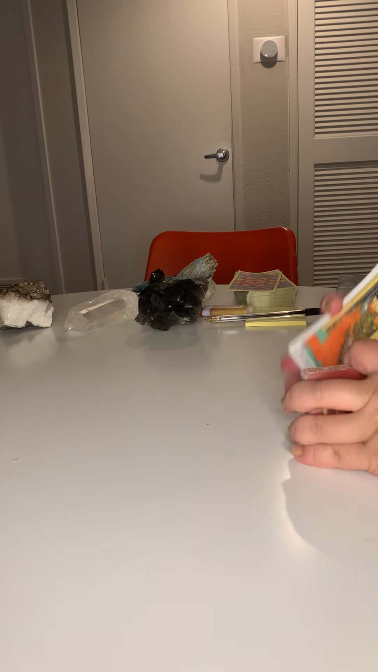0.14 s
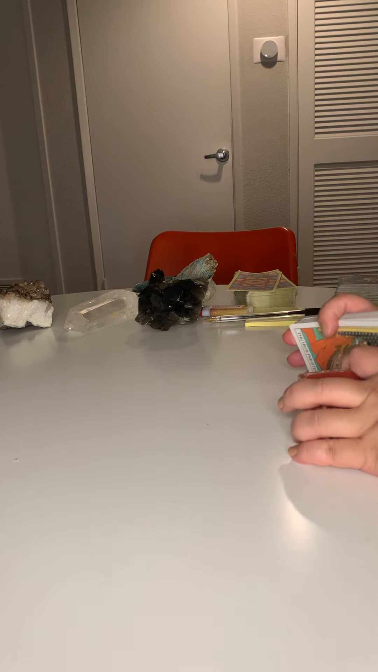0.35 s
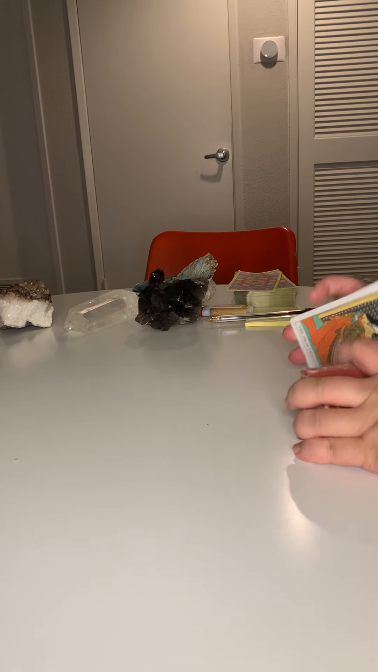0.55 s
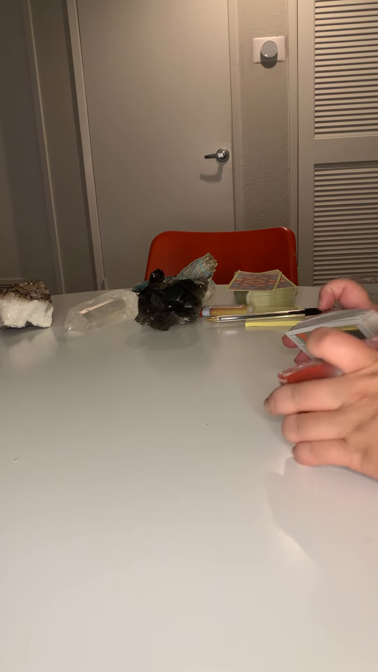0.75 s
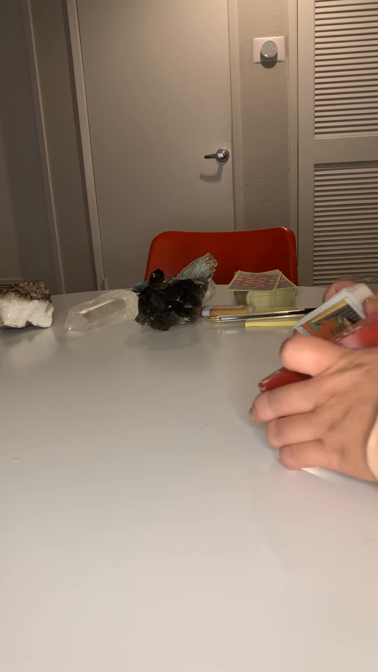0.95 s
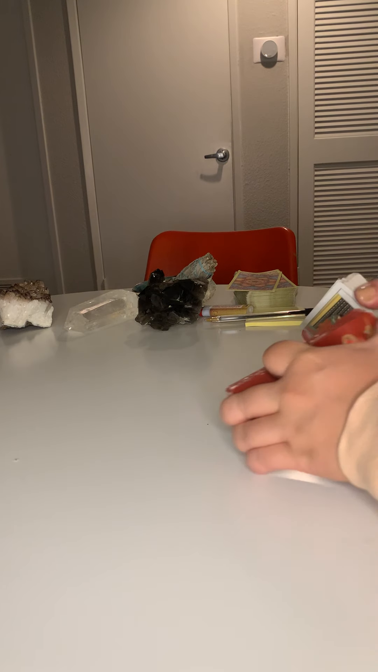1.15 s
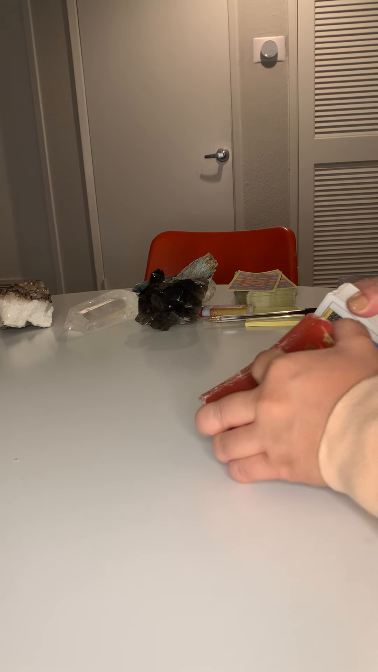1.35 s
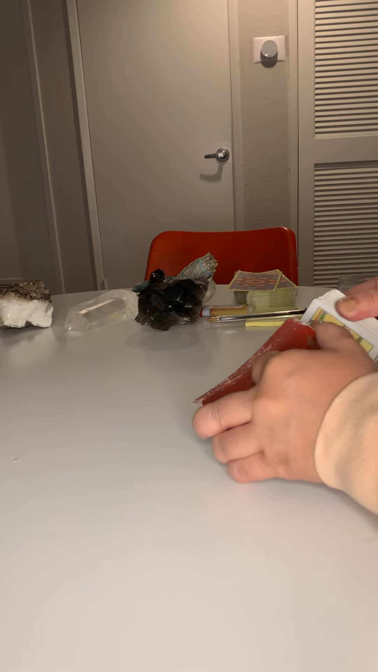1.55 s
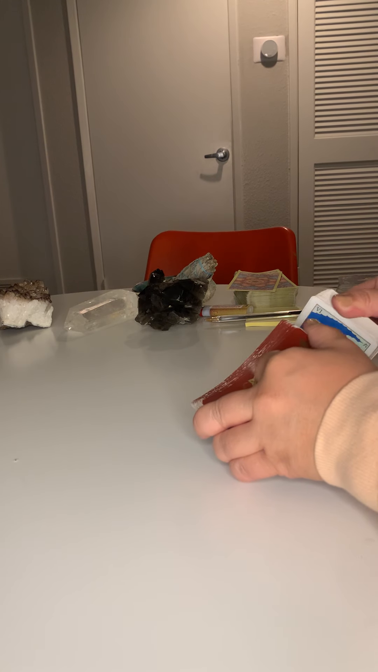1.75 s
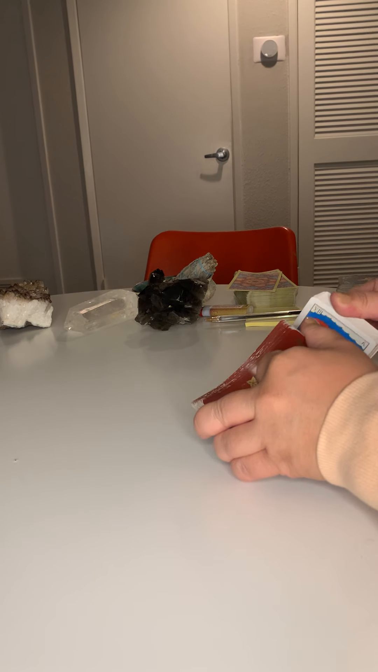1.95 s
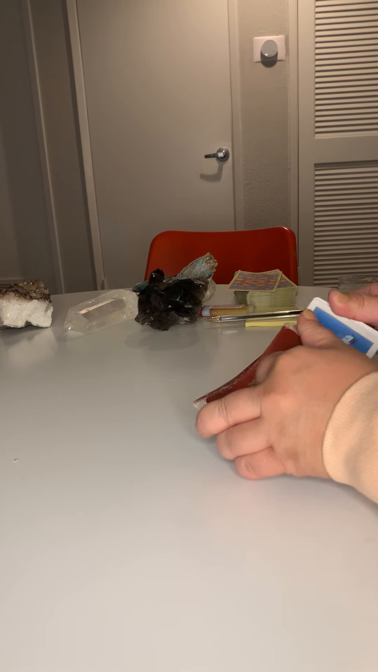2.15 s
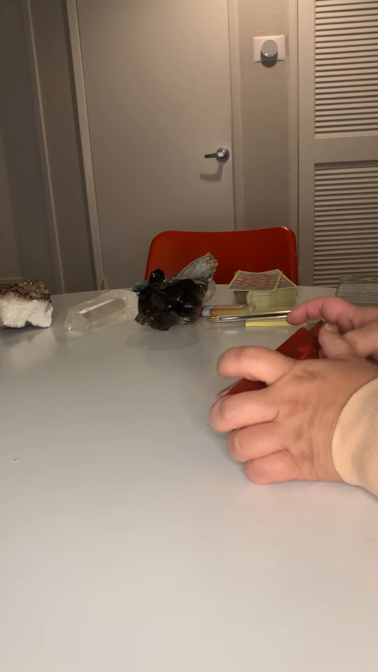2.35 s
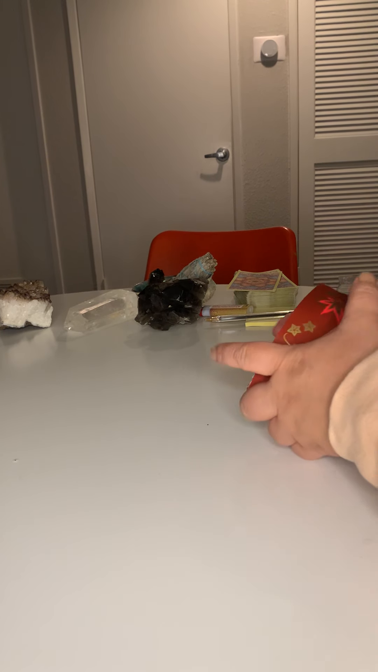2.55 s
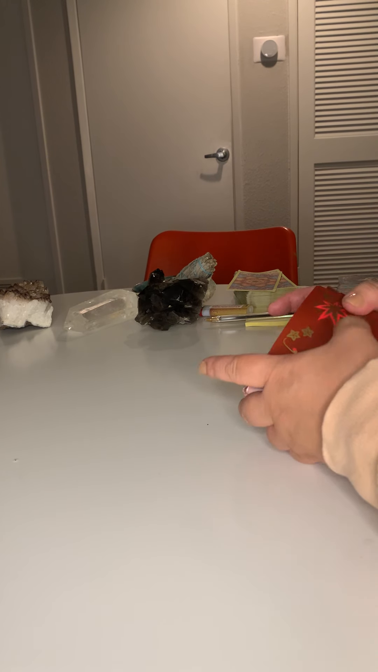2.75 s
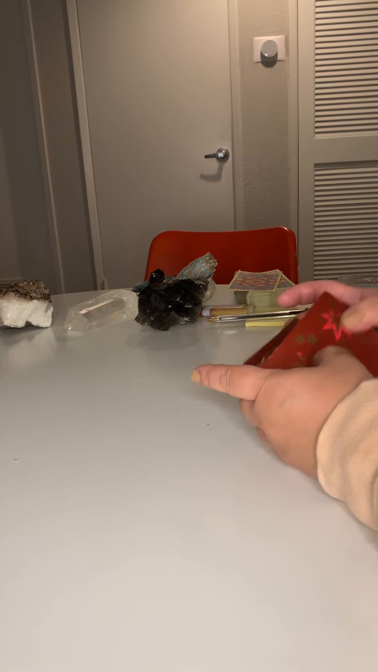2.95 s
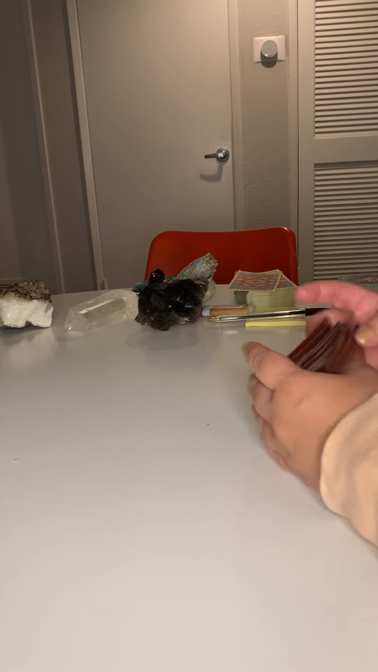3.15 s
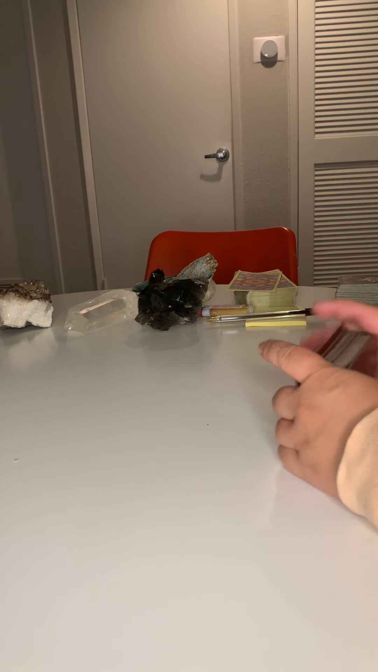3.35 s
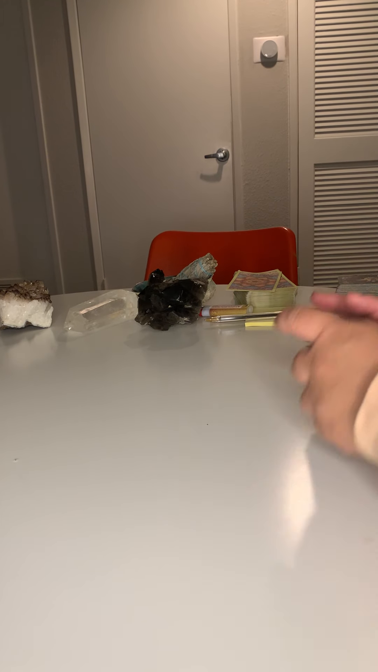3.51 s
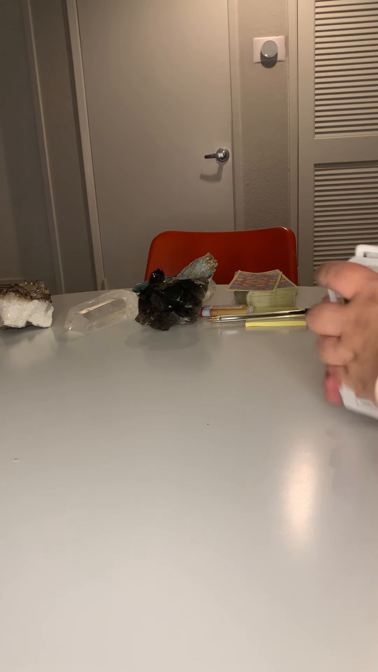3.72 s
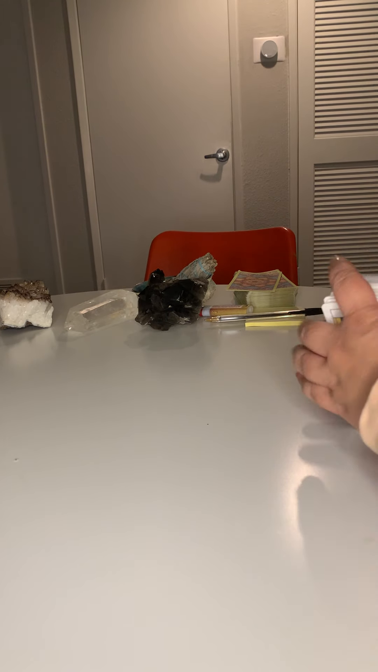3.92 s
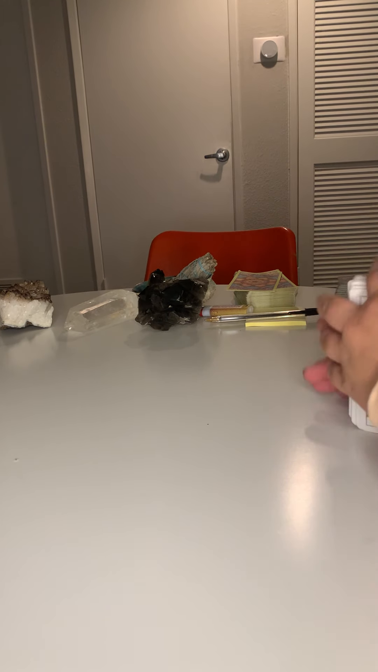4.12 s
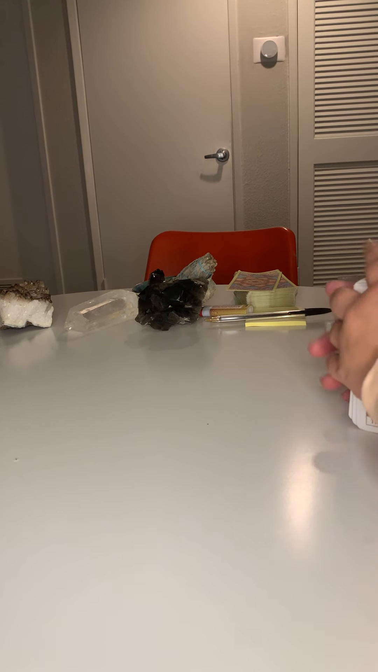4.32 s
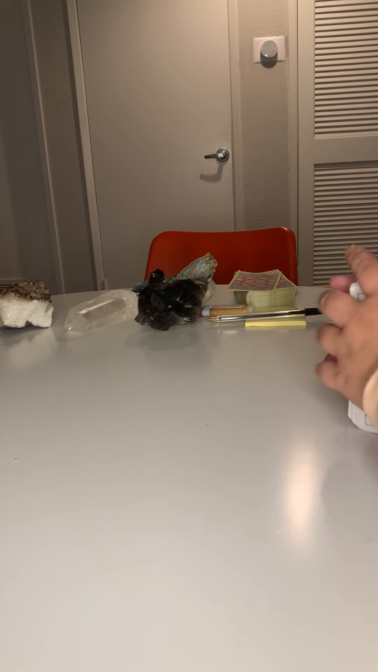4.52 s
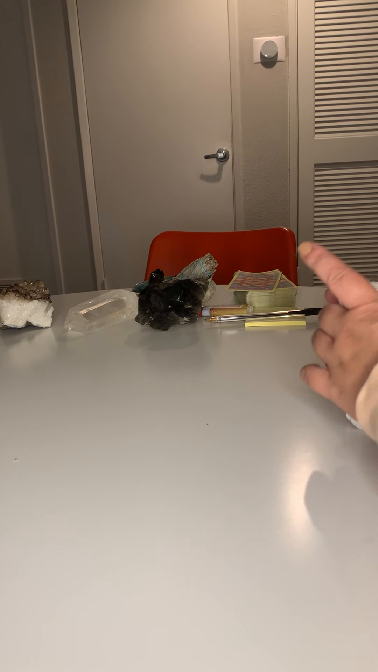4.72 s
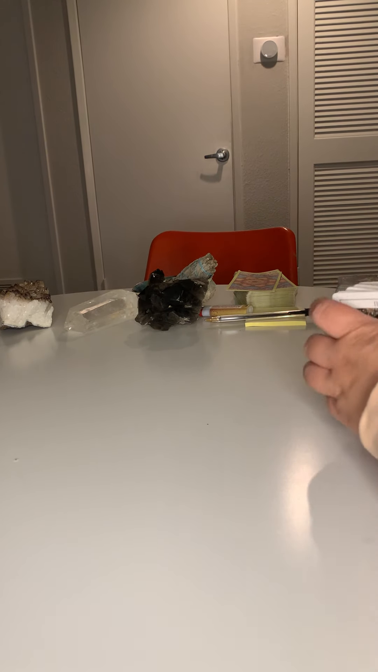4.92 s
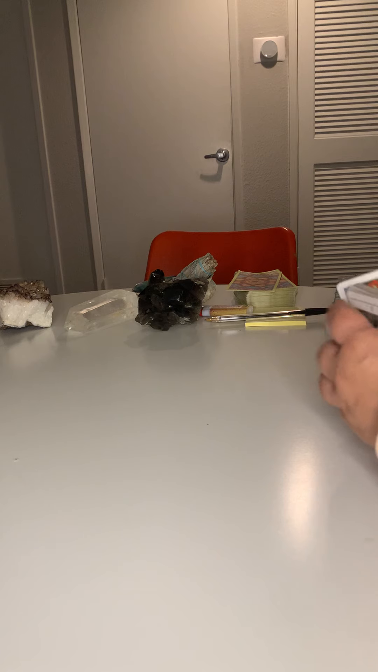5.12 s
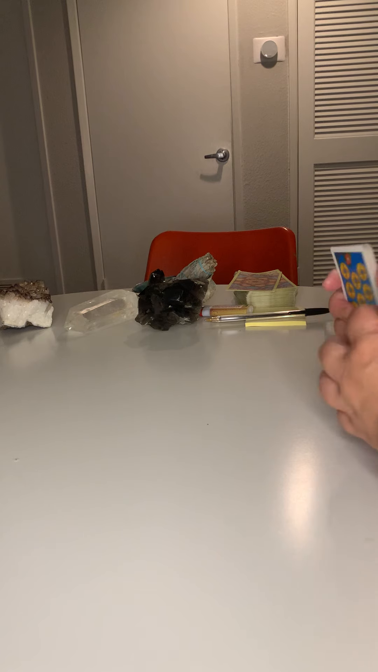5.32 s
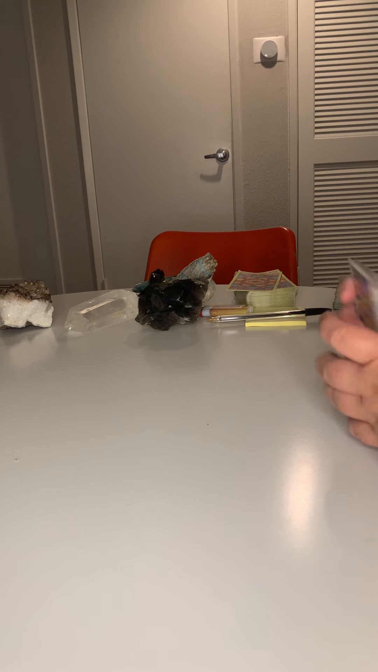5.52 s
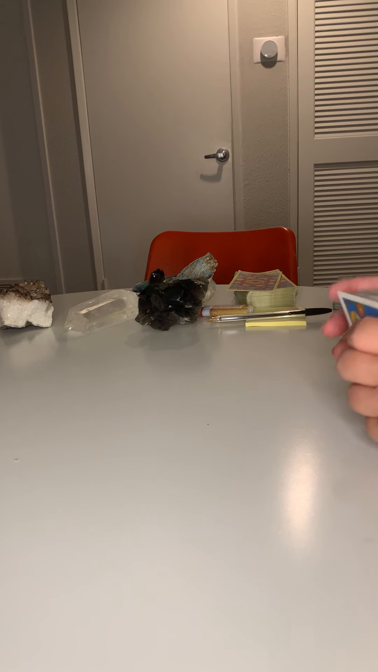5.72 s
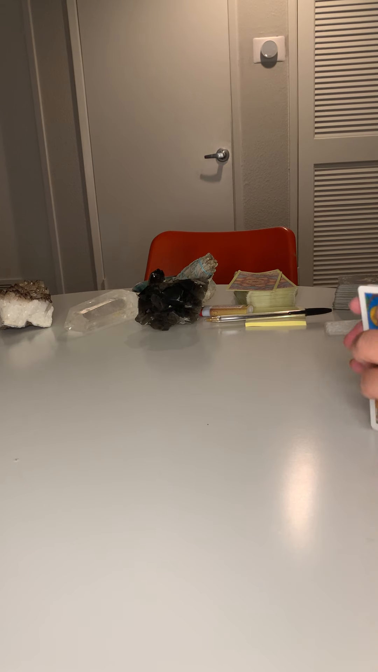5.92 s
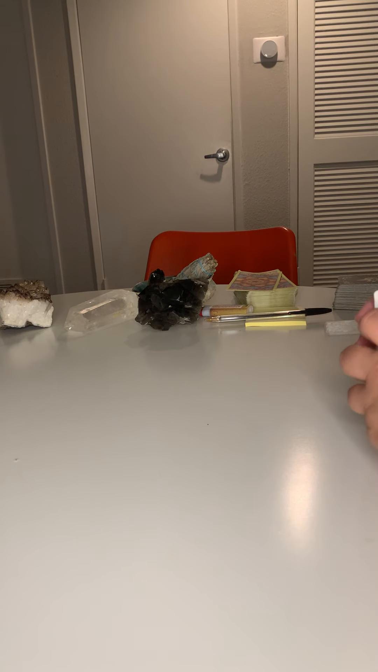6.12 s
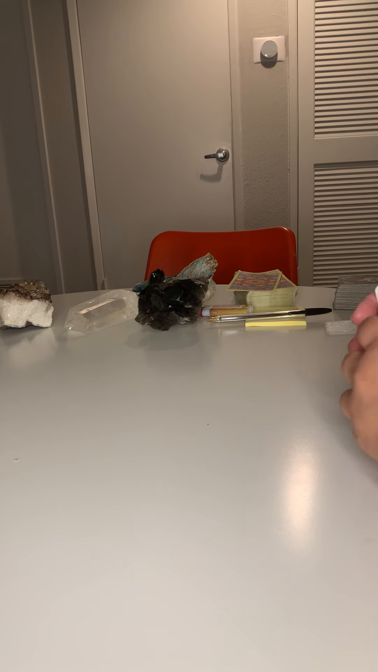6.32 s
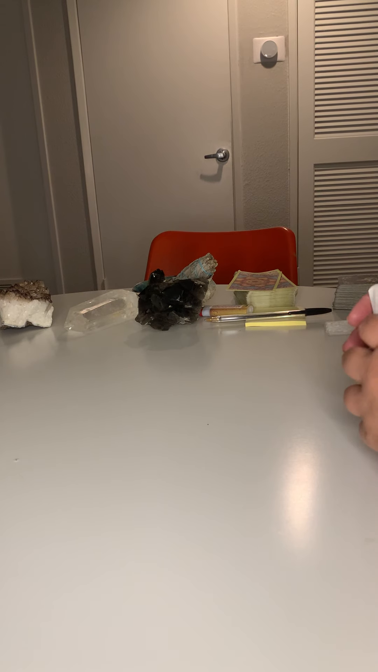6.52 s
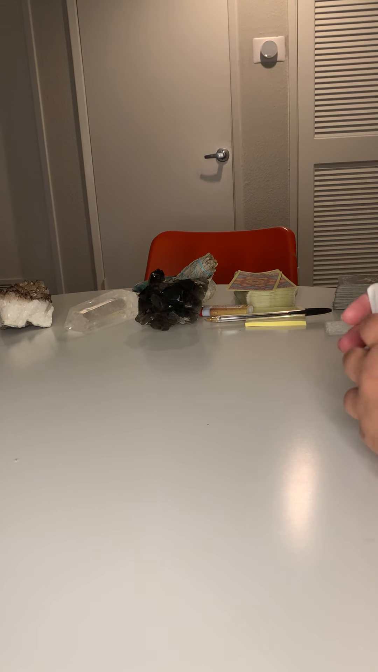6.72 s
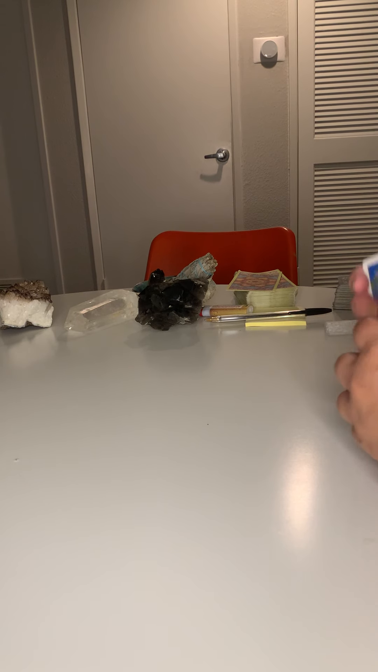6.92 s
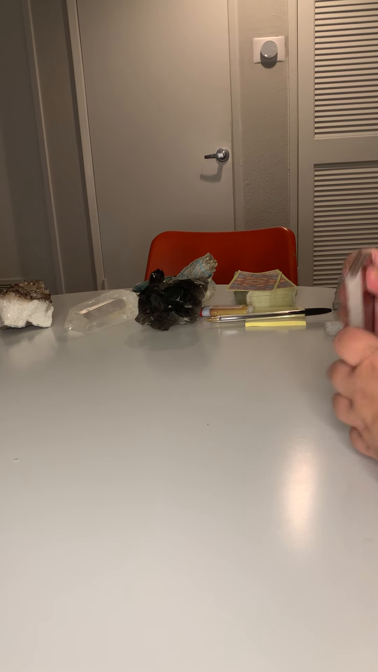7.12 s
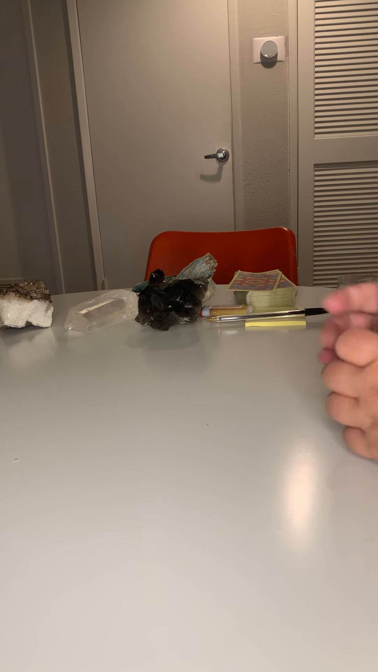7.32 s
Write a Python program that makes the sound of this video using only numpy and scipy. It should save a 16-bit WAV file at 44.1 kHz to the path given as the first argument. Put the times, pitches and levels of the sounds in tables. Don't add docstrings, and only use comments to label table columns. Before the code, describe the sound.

Cards flutter and slide in a rapid riffle, followed by softer knocks, pats and packet drops, close up in a small humming room.

```python
import sys
import numpy as np
from scipy import signal
from scipy.fft import rfft, irfft
from scipy.io import wavfile
from scipy.ndimage import uniform_filter1d

SR = 44100
rng = np.random.default_rng(int(sys.argv[2]) if len(sys.argv) > 2 else 0)


def digitize_waveform(pressure):
    field = np.atleast_2d(pressure).T
    bounded = np.clip(field, -1, 1)
    quanta = np.round(bounded * 32767).astype(np.int16)
    wavfile.write(sys.argv[1], SR, quanta)


def natural_amplitude(level_db):
    exponent = np.asarray(level_db, float) / 20
    return 10 ** exponent


N = 324576

# pitch_hz, level_db, t60_s (time to die by 60 dB)
FLAT_DECK = [(690, -3, 0.011), (1008, 5, 0.012), (1109.5, -4, 0.045), (1270, 0.5, 0.017),
             (1691, -1.5, 0.039), (1918, -5, 0.02), (2270, -5, 0.0073)]
DETUNE_HELD, DETUNE_FLAT = 0.066, 0.0071


def evened(x):
    return x / np.sqrt(np.mean(x ** 2) + 1e-20)


def read(points, hz):
    f, value = np.transpose(points)[:2]
    return np.interp(np.log(hz + 1), np.log(f + 1), value)


def coloured(x, points):
    gain = natural_amplitude(read(points, np.fft.rfftfreq(len(x), 1 / SR)))
    return evened(irfft(rfft(x) * gain, len(x)))


def drift(rate_hz):
    noise = uniform_filter1d(rng.standard_normal(N), 64)
    return evened(signal.lfilter([1], [1, -np.exp(-2 * np.pi * rate_hz / SR)], noise))


def add(mix, start_s, sound):
    part = mix[round(start_s * SR):][:len(sound)]
    part += sound[:len(part)]


def rung(force, modes, chance, detune=DETUNE_HELD):
    t = np.arange(3000) / SR
    ring = 0
    for (hz, db, t60), u, v in zip(modes, chance, chance[::-1]):
        level = natural_amplitude(db + 3.0 * u - 60 * t / t60)
        ring = ring + level * np.sin(2 * np.pi * hz * (1 + detune * v) * t)
    soft_start = (1 - np.exp(-t * modes[0][0] * 1.8)) ** 2
    out = signal.fftconvolve(force, ring * soft_start)[:max(len(t), len(force))]
    return out / abs(out).max()


def hum():
    # start_s, level_db
    strength = [
        (0.0, -33.5),
        (4.82, -33),
        (7.36, -33),
    ]
    # multiple of shaft pitch, level_db, lead_rad
    shaft_tones = [(1, 0, 0), (2, -19, .2), (3, -19.5, -2.3), (4, -27, .6), (5, -35, 0)]
    # pitch_hz, level_db
    whine_tones = [(383, -78), (406, -73), (592, -73), (773, -75.5)]
    # pitch_hz, level_db
    rumble_colour = [(25, -29), (45, 0), (66, -7), (77, 14.5), (88, 13), (150, 7), (250, -12.5), (400, -52)]
    shaft_hz, rumble_db = 58.02, -53.5
    t = np.arange(N) / SR
    turn = 2 * np.pi * (shaft_hz * t + .008 * drift(.5) - .44)
    shaft = sum(natural_amplitude(db + .5 * (k - 2.5) * drift(12.0)) * np.cos(k * turn + lead)
                for k, db, lead in shaft_tones)
    whines = sum(natural_amplitude(db + 1.6 * drift(3)) * np.sin(2 * np.pi * hz * t) for hz, db in whine_tones)
    rumble = natural_amplitude(rumble_db) * coloured(rng.standard_normal(N), rumble_colour)
    shaft_gain = natural_amplitude(np.interp(t, *np.transpose(strength)))
    return shaft_gain * np.sqrt(2) * shaft + np.sqrt(2) * whines + rumble


def room_air():
    # pitch_hz, level_db
    air_colour = [(150, -26), (250, 0), (600, -13.5), (1200, -26.5), (2500, -43), (5000, -44),
                  (9000, -44.5), (15500, -48)]
    return [natural_amplitude(-59) * coloured(rng.standard_normal(N), air_colour) for _ in range(2)]


def friction(points, per_s, spread_db, share, lumpy_db):
    size = natural_amplitude(spread_db * np.minimum(rng.exponential(1, N), 5))
    ticks = (rng.random(N) < per_s / SR) * size
    ticks = np.convolve(ticks, np.exp(-np.arange(60) / 6.2))[:N] * rng.standard_normal(N)
    share = np.clip(share, 0, 1)
    scrape = share * evened(ticks) + (1 - share) * rng.standard_normal(N)
    return coloured(scrape * natural_amplitude(lumpy_db * drift(20.0)), points)


def sliding():
    # pitch_hz, level_db
    rub_colour = [(150, -36.5), (300, 3.5), (700, 1.5), (1500, 0.5), (2100, -5), (3500, -22.5), (6000, -42)]
    scrape_colour = [(1200, -20.5), (2500, -7), (4000, 1), (6500, -4.5), (9000, -24.5), (14000, -40.5)]
    hiss_colour = [(3500, -42), (7000, -1), (9500, 6), (12000, -1), (15500, -0.5)]
    # start_s, length_s, rub_db, scrape_db, hiss_db
    strokes = [(0, 0.12, -47, -62.5, -69), (0.269, 0.17, -40, -63.5, -83),
               (0.43, 0.35, -62, -77, -78), (0.634, 0.15, -62, -84, -96),
               (1.029, 0.1, -61, -64.5, -72), (1.474, 0.089, -41, -39, -65),
               (1.61, 0.16, -43, -37.5, -38.5), (1.831, 0.33, -62, -34.5, -52),
               (1.978, 0.057, -35, -44, -42), (2.09, 0.11, -30, -26, -25.5),
               (2.307, 0.28, -48.5, -48, -53.5), (2.696, 0.073, -41, -31, -23.5),
               (2.813, 0.15, -32, -31.5, -28), (1.762, 0.014, -51, -44.5, -48),
               (2.19, 0.0073, -28.5, -23, -25), (3.134, 0.016, -33, -41.5, -63),
               (3.18, 0.015, -47, -38, -80), (3.248, 0.0095, -30, -43.5, -45),
               (3.321, 0.064, -62, -40, -80),
               (3.43, 0.19, -51.5, -55.5, -65), (3.665, 0.043, -42, -43, -50.5),
                    (3.814, 0.34, -41, -71.5, -71), (4.211, 0.12, -40, -86, -90),
                    (4.505, 0.18, -54.5, -94, -85), (5.024, 0.11, -43.5, -73.5, -69),
                    (5.132, 0.052, -27.5, -63, -76.5), (5.177, 0.023, -52, -50.5, -51.5),
                    (5.284, 0.15, -45.5, -67.5, -90), (0.234, 0.016, -48, -58, -54.5),
                    (3.24, 0.034, -66, -60, -57), (3.822, 0.023, -41, -72, -68),
                    (5.614, 0.016, -60, -57.5, -49), (6.299, .02, -50, -57, -64.5),
                    (5.353, .06, -45.5, -65, -67), (5.675, 0.014, -39, -59, -69),
                    (5.85, 0.013, -59, -68, -57.5), (5.94, 0.015, -68, -64, -62),
                    (6.936, 0.031, -36, -73.5, -84.5), (3.907, 0.04, -50, -68, -80.5),
                    (5.544, 0.15, -43, -54.5, -53), (5.837, 0.24, -49, -79.5, -88.5),
                    (5.965, 0.22, -52.5, -67, -71), (6.322, 0.18, -46, -90, -87),
                    (6.688, 0.026, -55, -60.5, -64.5), (6.839, 0.055, -38, -80.5, -59.5),
                    (7.036, 0.012, -51, -50, -52), (4.924, 0.031, -63, -68, -75.5),
                    (0.869, 0.0073, -53, -57.5, -79), (7.196, 0.055, -42, -68, -60.5),
                    (7.282, 0.012, -63, -48.5, -42.5), (7.346, 0.068, -24, -62, -72)]
    # rub, scrape, hiss (dB per second)
    rise_db_per_s = (454, 699, 1100)
    # rub, scrape, hiss (dB per second)
    fall_db_per_s = (157.5, 218, 305)
    # rub_db, scrape_db, hiss_db between strokes
    fidget_db = (-85, -81, -78)

    layers = [friction(colour, per_s=400, spread_db=3.5, share=.46, lumpy_db=3.0)
              for colour in (rub_colour, scrape_colour, hiss_colour)]
    deck_ring = rung(layers[0], FLAT_DECK, np.zeros(len(FLAT_DECK)))
    layers[0] = evened(layers[0] + natural_amplitude(-11) * evened(deck_ring))

    start, length, *levels_db = np.transpose(strokes)[:, :, None]
    t = np.arange(0, N / SR + .002, .002)
    early = np.maximum(start - t, 0)
    late = np.maximum(t - start - length, 0)
    mix = np.zeros(N)
    for layer, db, rise, fall, rest_db in zip(layers, levels_db, rise_db_per_s, fall_db_per_s, fidget_db):
        gain = natural_amplitude(db - rise * early - fall * late).sum(0) + natural_amplitude(rest_db)
        mix += natural_amplitude(-8.5) * np.interp(np.arange(N) / SR, t, gain) * layer
    return mix


def bend(ms):
    top_hz, sag_s, rise_s, fall_s = 3566, 0.002243, 0.0012, 0.0019
    t = np.maximum(np.arange(1024) / SR - ms / 2000, 0)
    turns = top_hz * t / (1 + t / sag_s)
    wave = (1 - np.exp(-t / rise_s)) * np.exp(-t / fall_s) * np.sin(2 * np.pi * turns)
    return wave / abs(wave).max()


def hit(deck, noise, db, corner_db, snap_db, thud_db, ms):
    # pitch_hz, level_db, t60_s
    corner_modes = [(2872, -2.5, 0.0055), (2880, -4, 0.006), (3680, -1.5, 0.004), (4286, 9, 0.002)]
    # pitch_hz, level_db, t60_s
    table_modes = [(243, -9.5, 0.11), (328, -6, 0.057), (429, 0.5, 0.033), (553, 3.5, 0.023)]
    held = deck is not FLAT_DECK
    u = np.arange(2048) / SR / (np.clip(ms, .3, 15) / 1000)
    force = noise * (1 - np.exp(-u / 0.21)) * np.exp(-u)
    force[round(SR * ms / 2000)] += 0.74 * np.linalg.norm(force)

    edge_hz = np.clip(15000 * natural_amplitude(0.39 * snap_db), 6500, 16000)
    no_bass = signal.butter(3, 4000, "highpass", fs=SR, output="sos")
    dulling = signal.butter(1, edge_hz, fs=SR, output="sos")
    crack = noise[::-1] * (1 - np.exp(-u / 0.41)) * np.exp(-u / 1.2)
    snap = signal.sosfilt(np.vstack([no_bass, dulling]), crack)

    out = rung(force, deck, noise[-16:], DETUNE_HELD if held else DETUNE_FLAT)
    out = out + natural_amplitude(corner_db + 12.0) * rung(force, corner_modes, noise[-32:])
    out *= natural_amplitude(-3.5 * held)
    out[:1024] += natural_amplitude(-6 if held else -18.5) * bend(ms)
    out += natural_amplitude(thud_db + 2.5) * rung(force, table_modes, noise[-48:])
    out[:len(u)] += natural_amplitude(snap_db + 7.0) * snap / abs(snap).max()
    return natural_amplitude(db + 2.0) * out


def cards():
    # pitch_hz, level_db, t60_s
    bent_deck = [(562, 3.5, 0.0037), (860, 9.5, 0.0047), (1045, 8.5, 0.0038), (1321, 4.5, 0.007),
                 (1510, -3, 0.012), (1736, 2.5, 0.0091), (2180, -2, 0.0055)]
    # pitch_hz, level_db, t60_s
    loose_deck = [(500, 6, 0.0047), (973, 2.5, 0.015), (1230, 7, 0.0074), (1634, -4.5, 0.018),
                  (2030, -5, 0.0068)]
    # start_s, blow_db, corner_db, snap_db, thud_db
    setting = [
        (0.106, -47, -41.5, -34.5, -2.5),
        (0.125, -44.5, -36, -19, -4),
        (0.23, -32.5, -27, -22, -5.5),
        (0.278, -30.5, -5, -7, -5.5),
        (0.302, -14, -45, -37, -34.5),
        (0.648, -31.5, -22.5, -31.5, -7),
        (0.891, -48.5, -4, -13, -22),
        (1.103, -51.5, -13, -28, -9),
    ]
    # start_s, blow_db, corner_db, snap_db, thud_db
    flicks = [(1.013, -69, 8, -18, -30), (1.03, -69, 6, -10, -30), (1.042, -57, -6, -18, -32),
              (1.896, -14.5, -5, -40, -32.5), (2.718, -31, -24, -16, -8), (2.735, -29, -6, -25, -23),
              (3.031, -24.5, -14, -27.5, -17), (4.62, -45.5, -24, -26, -16), (5.963, -34, -21, -37.5, -10),
              (5.975, -32.5, -10, -24.5, -9), (6.368, -35, -28, -27, -8), (.087, -64, -21, 7, -27)]
    # start_s, blow_db, corner_db, snap_db
    release = [(1.445, -51, -7, 6.5), (1.467, -28, -9, -2.5), (1.472, -27.5, -18, 2),
               (1.525, -28, -23.5, -6), (1.57, -35, -7.5, 0.5), (1.594, -15.5, -15.5, -8.5),
               (1.598, -26.5, -14.5, -14), (1.612, -21, -11, -9), (1.617, -19, -18.5, 0),
               (1.666, -32, -13, -2.5), (1.684, -12, -21.5, -11.5), (1.71, -23.5, -17.5, -7.5),
               (1.73, -11, -11, -11.5), (1.763, -37, -15, -13), (1.813, -32, -17.5, -5.5),
               (1.828, -4, -20.5, -12.5), (1.84, -17.5, -16.5, -9.5), (1.89, -8.5, -8.5, -3.5),
               (1.893, -10, -9.5, -21), (1.902, -26.5, -6, -18), (1.955, -9.5, -14.5, -13.5),
               (1.96, -17.5, -12.5, 3), (1.98, -17, -15.5, -2.5), (1.998, -8.5, -24.5, -11.5),
               (2.008, -16, -12.5, 1.5), (2.018, -19.5, -21, 2.5)]
    # start_s, blow_db, corner_db, snap_db
    tumble = [(2.072, -12, -14.5, -14.5), (2.082, -12.5, -8.5, 1.5), (2.104, -9.5, -7.5, -25.5),
              (2.11, -15.5, -1.5, -12), (2.13, -13, -20.5, -7.5), (2.155, -12.5, -25, -4.5),
              (2.174, -17.5, -12, -8.5), (2.188, -13.5, -1.5, -6.5), (2.192, -20, -6.5, -1),
              (2.199, -22.5, -15.5, 8.5), (2.23, -12.5, -15, -16.5), (2.266, -27.5, -19, -3.5),
              (2.347, -36.5, -5, 2.5), (2.524, -50.5, -9.5, -11.5), (2.557, -49, 8, 0)]
    # start_s, blow_db, corner_db, snap_db
    push = [(2.713, -26.5, -30.5, -13), (2.729, -28, -15, -8), (2.758, -18, -22.5, -16.5),
            (2.763, -23.5, -21, -8.5), (2.779, -16.5, -17, -10.5), (2.8, -17, -30.5, -29),
            (2.816, -21, -7, -42), (2.841, -19, -31, -9.5), (2.869, -46.5, -10, 10),
            (2.914, -27, -2.5, -10.5), (2.922, -19.5, -33.5, 3), (2.945, -35, -20, -2),
            (2.982, -33, -9, 5.5), (3.025, -23, -13.5, -19.5), (3.129, -25.5, -17, -68.5),
            (3.139, -25.5, 0, -19), (3.175, -23, -8.5, -23.5), (3.183, -43, -14, -37),
            (3.204, -32.5, -9, -18.5), (3.253, -32.5, -9, -18), (3.322, -20, -4, -8.5)]
    # start_s, blow_db, corner_db, snap_db
    slips = [(1.478, -28.5, -8, -12.5), (1.497, -36.5, -11.5, -10.5), (1.587, -30, -14.5, -10.5),
             (1.672, -28.5, -17.5, -17.5), (1.75, -31.5, -16, -12), (1.771, -29, -14, 4),
             (1.774, -28, -18, -10.5), (1.984, -19.5, -10, -13.5), (2.005, -21, -7.5, -4.5),
             (2.098, -21, -3.5, 0.5), (2.127, -19, -9, 0), (2.150, -18, -15.5, -1),
             (2.179, -24, -9.5, -13.5), (2.185, -24.5, -4, -9), (2.203, -33, -4.5, -10),
             (2.215, -24.5, -18, -6.5), (2.222, -26.5, -13, -8.5), (2.746, -28, -15, -8),
             (2.872, -31, -15.5, -5.5), (2.987, -42.5, -7, 7), (3.144, -26, -11, -17),
             (3.152, -23.5, -12, -27), (3.163, -26, -11.5, -31), (3.193, -31, -5.5, -18.5),
             (3.261, -28, -5, -23.5), (3.328, -30.5, -6, -5.5)]
    # start_s, blow_db, corner_db, snap_db, thud_db
    squaring = [(3.766, -19, -9.5, -32, -14.5), (3.964, -29, -6.5, -24, -11), (4.096, -33.5, -12, -36, -20),
                (4.142, -44.5, 0.5, -30, -3.5), (4.178, -31, -6.5, -19.5, -22.5),
                (4.366, -40.5, -29, -40.5, -7), (4.53, -46.5, -18, -33.5, -13.5),
                (4.61, -37.5, -33.5, -50.5, -15), (5.007, -41.5, -32, -37, -13),
                (5.076, -47, -33.5, -21, 4), (5.108, -35, -22, -47, 2.5), (5.13, -38, -34, -42, -14),
                (5.158, -24.5, -20, -56.5, -9.5), (5.17, -42, -7, -16.5, -36),
                (5.203, -27.5, -7, -23.5, -5), (5.213, -20, -11.5, -32.5, -43)]
    # start_s, blow_db, corner_db, snap_db, thud_db
    pats = [(3.903, -51.5, -18.5, -37, -14), (3.914, -36, -20, -43, -4.5), (3.937, -35.5, -33, -22, -5.5),
            (3.946, -29, -27.5, -40.5, -6.5), (4.015, -27, -17.5, -28.5, -29),
            (4.024, -49.5, -5.5, -32.5, -19), (4.035, -33.5, -21, -30, -6),
            (4.105, -37, -16.5, -31.5, -3.5), (4.234, -29.5, -20, -41, -13),
            (4.249, -28, -34, -35.5, -10.5), (4.266, -36.5, -13, -33, -17.5), (5.79, -37, -23, -28, -22),
            (5.855, -36, -32.5, -34, -6), (5.939, -52.5, -17, -27, -2), (6.283, -57, -27, -34, 1),
            (6.82, -29, -16, -35, -8.5), (6.941, -32, -27, -41, 0), (6.958, -30.5, -29, -42, -13),
            (6.977, -43.5, -25, -53, 3), (6.992, -48, -28.5, -33, 11), (7.028, -52.5, -20, -11, -4.5),
            (7.083, -61, -25, -40, 13), (7.153, -29.5, -47, -40.5, 2)]
    # start_s, blow_db, corner_db, snap_db, thud_db
    cuts = [(5.421, -40.5, -37, -46, -2), (5.55, -34, -31, -20, 4.5), (5.603, -36.5, -25, -19, -0.5),
            (5.624, -17, -10, -26, -6.5), (5.843, -34.5, -27, -39, -4.5), (5.967, -29.5, -11.5, -43, -20.5),
            (6.302, -23, -19.5, -33, -17), (6.313, -29.5, -17, -56.5, -24), (6.351, -37, -8, -35, -4),
            (6.361, -29.5, -11, -42.5, -23), (6.78, -47, -38.5, -29.5, 11), (6.826, -25.5, -13, -24, -29),
            (6.935, -40, -27, -34, -11.5), (6.949, -37, -22, -40.5, -11.5), (6.967, -42, -27.5, -29.5, -17),
            (7.159, -43, -42, -49, 4), (7.223, -39, -19, -36, -10.5), (7.235, -25.5, -18, -36.5, -45),
            (7.327, -21.5, -16, -28, -10.5), (7.345, -31, -2.5, -26.5, -36)]
    card_ms, wedged_ms, packet_ms, pat_ms = 1.1, 0.86, 3.2, 1.43

    def with_thud(rows):
        return [(*row, -31.5 - 0.59 * row[1]) for row in rows]

    groups = [(with_thud(release + tumble), bent_deck, card_ms),
              (with_thud(push + slips), bent_deck, wedged_ms),
              (setting, bent_deck, packet_ms),
              (squaring + cuts, FLAT_DECK, packet_ms),
              (pats, loose_deck, pat_ms),
              (flicks, bent_deck, pat_ms)]
    mix = np.zeros(N)
    for rows, deck, ms in groups:
        noises = rng.standard_normal((len(rows), 2048))
        for (start_s, db, corner_db, snap_db, thud_db), noise in zip(rows, noises):
            contact_ms = ms * natural_amplitude(-.15 * snap_db)
            add(mix, start_s, hit(deck, noise, db, corner_db, snap_db, thud_db, contact_ms))
    return mix


def flaps():
    # start_s, pitch_hz, level_db, t60_s
    flap_notes = [(0.301, 1560, -26, .01), (.649, 1685, -22, 0.0076), (.65, 700, -34, 0.026),
                  (1.598, 423, -23, 0.028), (1.617, 485, -18, 0.012), (1.671, 446, -18.5, 0.025),
                  (1.687, 766, -17.5, 0.0083), (1.73, 840, -20, 0.013), (1.768, 607, -32, 0.032),
                  (1.83, 818, -14.5, 0.028), (3.027, 770, -47, 0.022), (3.146, 1667, -22.5, 0.09),
                  (3.915, 446, -26, 0.019), (4.25, 501, -34, 0.021), (4.612, 703, -42.5, 0.035),
                  (5.63, 262, -26, 0.084), (6.318, 597, -33, 0.11), (.303, 690, -33, 0.062),
                  (.651, 576, -48, 0.039), (2.082, 6720, -6, 0.0091), (2.188, 3957, -21, .012),
                  (3.765, 3190, -25.5, 0.03), (3.767, 1090, -26, 0.073), (4.611, 2900, -43.5, 0.0082),
                  (5.213, 1106, -24, 0.067), (5.625, 3480, -16, 0.017), (5.97, 2540, -25.5, 0.023),
                  (5.972, 1905, -25.5, 0.045), (6.312, 1154, -40, 0.054), (6.827, 1624, -22, 0.016),
                  (7.328, 1717, -17, 0.014), (5.97, 3020, -46, .02), (5.969, 3780, -30.5, 0.022),
                  (6.305, 2445, -23, 0.02), (6.313, 3090, -30.5, 0.02), (6.364, 3365, -35, 0.024)]
    mix, t = np.zeros(N), np.arange(3000) / SR
    for start_s, hz, db, t60 in flap_notes:
        level = natural_amplitude(db - 60 * t / t60) * (1 - np.exp(-t / 0.00014))
        add(mix, start_s, level * np.sin(2 * np.pi * hz * t))
    return mix


def room():
    # pitch_hz, t60_s
    ring_times = [(200, 0.43), (530, 0.19), (1400, 0.23), (3700, 0.46), (9700, 0.31), (16000, 0.32)]
    taps = np.zeros(SR // 2)
    at = np.arange(300, SR // 2 - 20, 20)
    taps[at + rng.integers(0, 20, len(at))] = rng.choice([-1., 1.], len(at))
    hz, t, bands = signal.stft(taps, SR, nperseg=256)
    decay = natural_amplitude(-60 * t / read(ring_times, hz)[:, None])
    dulling = np.hypot(1, hz / 7500)[:, None]
    build_up = 1 - np.exp(-t / 0.0018)
    tail = signal.istft(bands * decay / dulling * build_up, SR, nperseg=256)[1]
    power = abs(rfft(tail)) ** 2
    smoothing = np.sqrt(uniform_filter1d(power, size=600) / uniform_filter1d(power, size=60))
    tail = irfft(rfft(tail) * smoothing)
    return tail / np.linalg.norm(tail)


def scene():
    scatter = rng.standard_normal(128) * np.exp(-np.arange(128) / 59.0)
    tails = room(), room()
    background = room_air() + hum()
    no_bass = signal.butter(2, 170, "highpass", fs=SR, output="sos")
    hands = signal.sosfilt(no_bass, sliding() + cards() + flaps())
    turn = 2 * np.pi * 5.3 * np.arange(N) / SR + drift(2.3)
    aside = np.zeros(N)
    for share, v in zip((np.cos, np.sin), (scatter, scatter[::-1])):
        path = irfft(np.exp(1j * np.angle(rfft(v))))
        aside += np.convolve(hands * share(turn), path)[:N]
    here, there = (signal.fftconvolve(hands, tail)[:N] for tail in tails)
    return np.array([hands + natural_amplitude(-8.0) * here, aside + natural_amplitude(-6.5) * there]) + background


def low_pass(x):
    return signal.sosfilt(signal.butter(12, 16970, fs=SR, output="sos"), x)


def record(dry):
    # pitch_hz, likeness (0 to 1)
    likeness = [(150, 1.0), (400, .88), (1200, .85), (1800, .88), (2300, .55), (3300, .65), (4000, .92),
                (4400, .985)]
    # pitch_hz, lead_rad
    port_turn = [(80, 0), (300, .3), (700, .75), (1600, 0), (2300, -1.4), (3400, -1.5), (4700, -3.1),
                 (17450, -21.95)]
    # pitch_hz, level_db
    left_db = [(120, 0), (350, -2.4), (800, -2.6), (1400, 1), (2500, -2.1), (3600, -0.75),
               (4300, 0.1)]
    # pitch_hz, level_db
    mic = [(25, -32.5), (45, -2), (15600, -1.5), (15900, -20), (16700, -27.5), (17000, -56.5)]
    hz = np.fft.rfftfreq(N, 1 / SR)
    here, there = rfft(dry)
    same = np.clip(read(likeness, hz), 0, 1)
    right = same * here + np.sqrt(1 - same ** 2) * there
    right = right * np.exp(1j * np.interp(hz, *np.transpose(port_turn)))
    left = here * natural_amplitude(read(left_db, hz))
    ports = irfft(np.array([left, right]) * natural_amplitude(read(mic, hz)), N)
    return low_pass(ports)


dry = scene()
out = record(dry)
digitize_waveform(out)
```